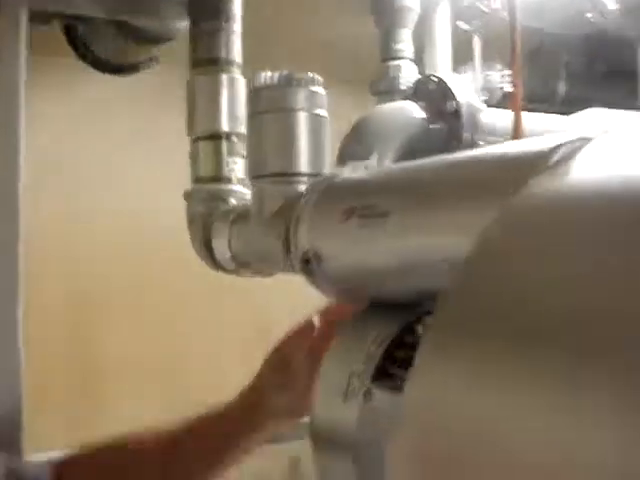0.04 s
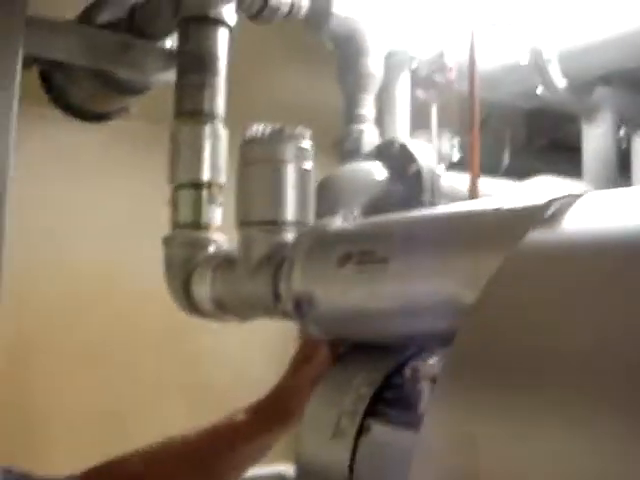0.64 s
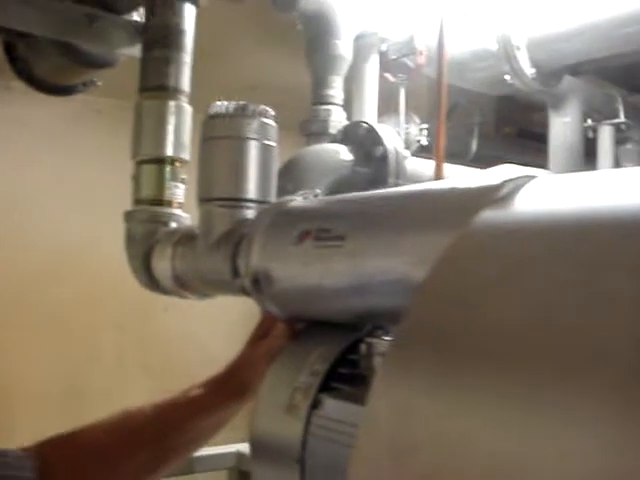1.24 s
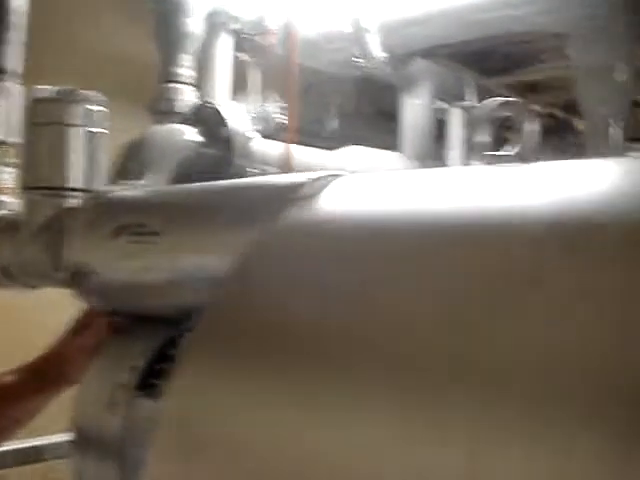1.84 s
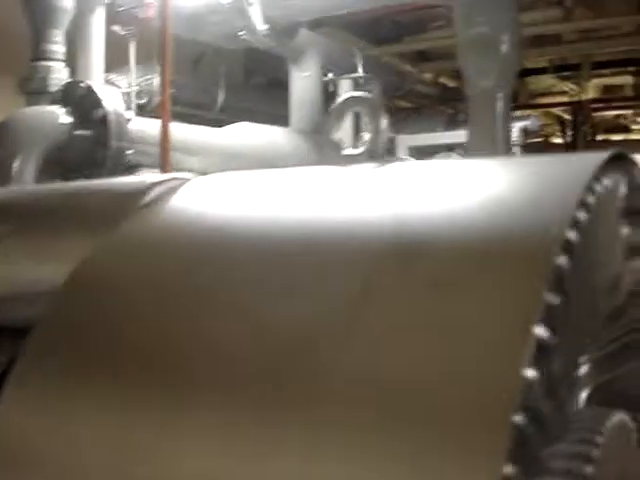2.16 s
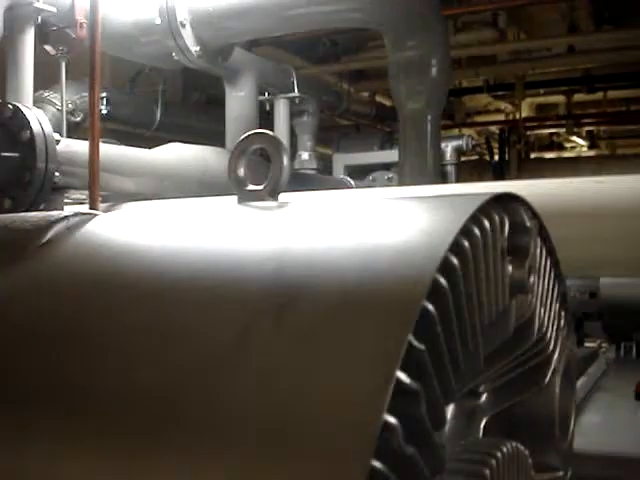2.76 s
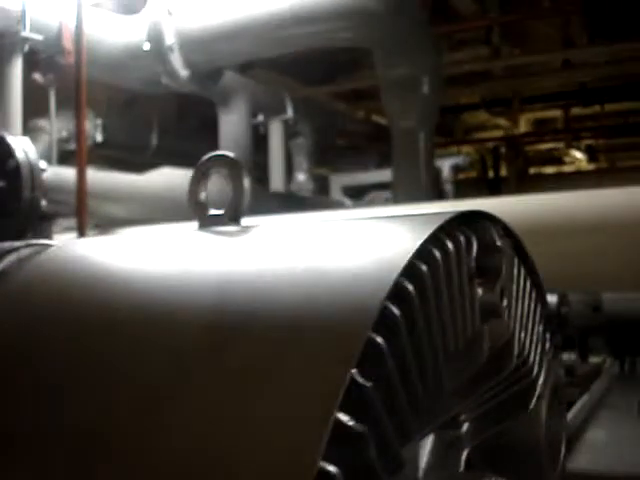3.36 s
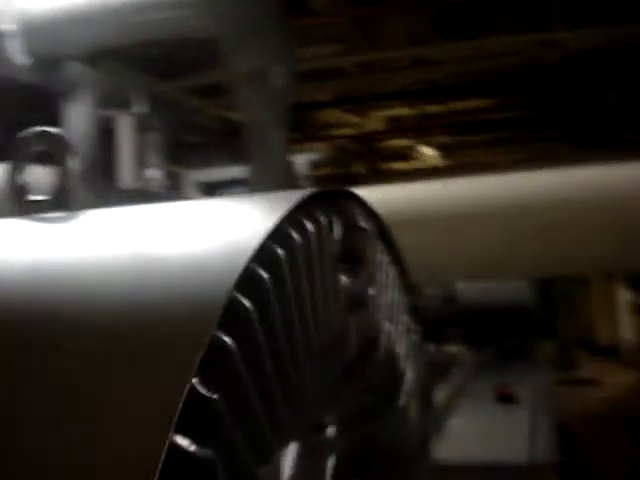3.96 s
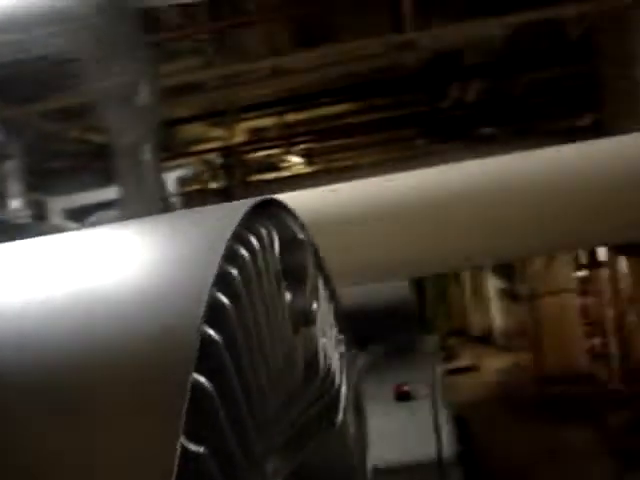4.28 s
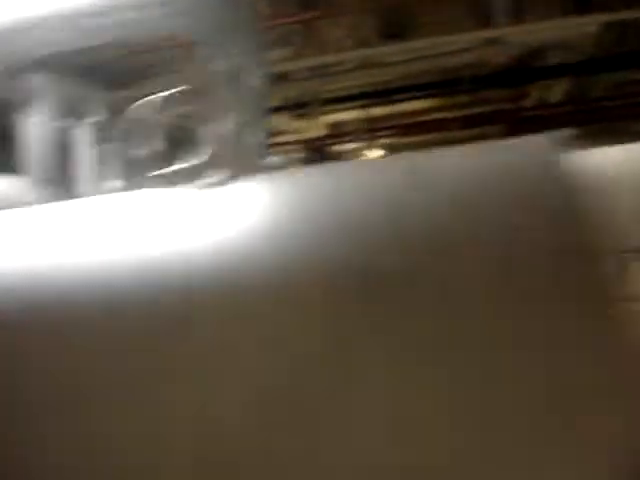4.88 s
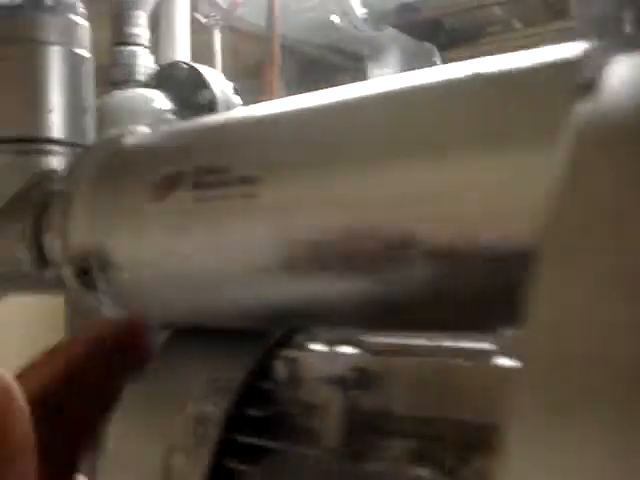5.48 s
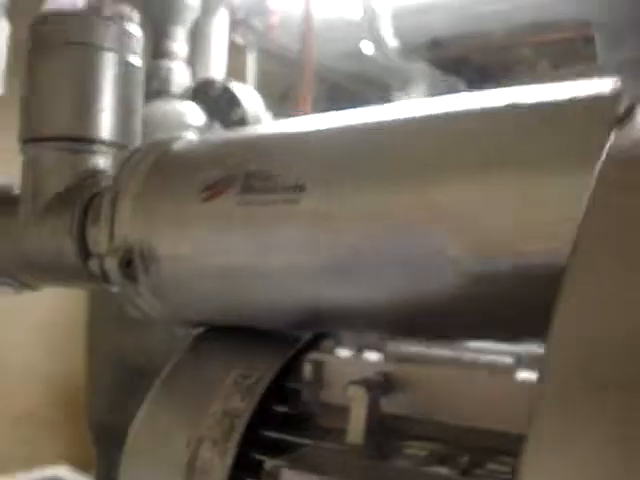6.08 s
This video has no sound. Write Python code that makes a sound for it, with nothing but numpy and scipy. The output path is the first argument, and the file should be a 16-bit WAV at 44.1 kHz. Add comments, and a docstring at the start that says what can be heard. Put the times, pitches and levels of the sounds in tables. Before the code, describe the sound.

Rushing air and a piercing, steady whine come from a metal blower, heard up close in a machine room. The whine keeps its pitch but shimmers as the microphone travels along the machine. After about two seconds the air softens a little, and a cooling fan's note and a lower motor tone come forward. Toward the end the balance shifts back to the blower's hiss and a higher thin tone, running without a break.

```python
"""Plant room, a regenerative blower at steady speed; one microphone, close, carried along the housing.
From the start the blades chop the air into a siren-like whine over a broad rush, with thin motor tones.
By 0.7 s the microphone faces the blower head. From about 2.2 s it faces the motor: the rush eases, and
the cooling fan's note and a lower motor tone come forward. From about 4.7 s it favours the head again.
All the way, each blade partial swells and fades as the microphone moves through standing waves."""
import sys
import numpy as np
from scipy import signal
from scipy.io import wavfile
from scipy.ndimage import uniform_filter1d

SR = 44100
rng = np.random.default_rng(int(sys.argv[2]) if len(sys.argv) > 2 else 0)


def file_out(sig):
    """Save sig as 16-bit WAV at sys.argv[1]."""
    # one column per channel
    cols = np.atleast_2d(sig).T
    # limit, then scale
    lim = np.clip(cols, -1, 1)
    pcm = np.round(lim * 32767).astype(np.int16)
    wavfile.write(sys.argv[1], SR, pcm)


N = 269877
TIME = np.arange(N) / SR
BLADE_PASS_HZ = 818
WALK_M_PER_S, SOUND_M_PER_S = 0.52, 343

# impeller's departure from the mean blade-pass rate: (time [s], offset [Hz])
BLADE_RATE_OFFSET = [(0.0, -0.85), (0.68, -0.013), (0.74, 1.85), (1.06, -0.21), (1.68, 0.88), (2.36, -0.71),
                     (2.4, 0.61), (3.42, -1.24), (3.78, 0.527), (3.94, -0.87), (5.24, -0.022), (6.12, -0.8)]
# blade partials 1-7 along the walk, the 2nd being the core of the whine: (time [s], relative level [dB])
PARTIAL_1 = [(0.0, -39), (0.32, -46), (0.48, -54.8), (1.66, -40.5), (4.92, -39.5), (5.82, -49.5),
             (6.12, -38)]
PARTIAL_2 = [(0, -23.5), (0.64, -27.5), (0.96, -34.5), (1.2, -28), (2.4, -24.5), (2.66, -22), (2.92, -23.5),
             (3.1, -22), (3.84, -22.5), (4, -38), (4.1, -26.5), (4.68, -29.5), (4.9, -39.5), (5.18, -28.5),
             (5.48, -42.9), (5.6, -28), (6, -26.7), (6.12, -33)]
PARTIAL_3 = [(0.0, -21), (0.24, -27), (1.18, -25), (1.86, -31.6), (2.06, -23.5), (2.42, -30), (2.84, -44.4),
             (2.92, -28.1), (3.08, -42), (3.14, -31), (3.64, -26.7), (3.78, -34.5), (4.68, -42.5),
             (4.9, -25.5), (5.76, -33.5), (6.12, -25.5)]
PARTIAL_4 = [(0.0, -26), (0.18, -52), (0.58, -38), (2.32, -24), (2.9, -30.4), (3.24, -28), (3.8, -34.5),
             (4.12, -26.7), (4.94, -29), (5.02, -35), (5.44, -36), (5.5, -28), (5.88, -26.0), (6.04, -34),
             (6.12, -24)]
PARTIAL_5 = [(0.0, -24.5), (0.18, -33.8), (0.24, -45), (0.64, -46), (0.74, -24.5), (0.84, -30.7),
             (2.24, -30.5), (2.46, -35.5), (3.24, -28), (3.58, -45), (3.78, -27.5), (4.1, -28.6),
             (4.54, -21.5), (5.02, -28.0), (5.18, -24), (5.9, -38.5), (5.98, -50), (6.12, -30.7)]
PARTIAL_6 = [(0.0, -41), (0.28, -53), (0.5, -34.5), (1.64, -41), (1.9, -35.5), (2.18, -46.5), (4.74, -31),
             (4.92, -48.4), (5.14, -31.5), (5.74, -45), (6.12, -38.8)]
PARTIAL_7 = [(0.0, -36.5), (1.5, -40), (1.68, -33.6), (2.74, -41), (4.18, -45.5), (4.82, -35),
             (5.14, -42.3), (5.62, -29.5), (6.12, -40.5)]
# faint top partials that fade at random: (multiple of the blade-pass rate, mean level [dB])
TOP_PARTIALS = [(9, -41.5), (10, -44.5)]
# blade partials arriving by way of the room: (multiple of the blade-pass rate, level [dB])
ROOM_PARTIALS = [(3, -42), (4, -39), (5, -37), (6, -45), (7, -44), (8, -42.5), (9, -46.5), (10, -47),
                 (11, -46.5), (12, -45.5)]
# how squarely the microphone faces the blower head rather than the motor: (time [s], facing [dB])
HEAD_FACING = [(0, 1.5), (.7, 7), (1.85, 7), (2.25, -4), (3.4, -2), (4.2, -1.5), (4.75, 3), (5.3, 1),
               (5.65, 5.5), (6.12, 4)]
# spectrum of the rushing air: (frequency [Hz], relative density [dB])
RUSH_SPECTRUM = [(20, -14.5), (85, -28), (135, -16.5), (160, -16.5), (370, -4), (600, -2.5), (750, -4),
                 (920, 0.3), (1400, -2), (2200, -2.5), (2900, -2.5), (3750, -4.5), (6000, -4),
                 (8600, -10.5), (10000, -11)]
# resonances of housing and silencer: (frequency [Hz], width [Hz], boost [dB])
HOUSING_RESONANCES = [(1160, 89, 0), (2480, 120, 2), (3350, 78, 4.5), (4140, 170, 5)]
# thin motor tones: (frequency [Hz], level [dB])
MOTOR_TONES = [(845, -49.5), (1459, -52.5), (1789, -52), (2672, -46), (2767, -52), (2857, -48), (2976, -49),
               (3036, -46), (3088, -49), (3581, -52.5), (5982, -52), (9641, -54)]
# tones strongest beside the blower head: (frequency [Hz], level at 0 dB facing [dB])
HEAD_SIDE_TONES = [(296.1, -61.5), (619, -56), (1517, -45.5), (2149, -44), (2271, -48.5), (6428, -48)]
# the two loudest thin tones: (pitch beside the motor [Hz], pitch beside the head [Hz])
LOUD_PAIR_HZ = (1909.5, 3213.5)
# those two tones, lower first: (level at 0 dB facing [dB], change with facing [dB/dB])
LOUD_PAIR_LEVELS = [(-40, -0.9), (-39.5, 1)]
# mains and shaft hum: (frequency [Hz], level [dB])
HUM_TONES = [(58.5, -65), (86.1, -67.5), (107.7, -60), (119.8, -60.5)]


def impeller_whine(wobble_hz=0.815, jitter_hz=1.316, lift_db=0.22):
    """Blades pass the port; turbulence shakes their timing, which blurs the high partials most."""
    wobble = wobble_hz * drift(rate_hz=8.9).real
    jitter = jitter_hz * drift(rate_hz=43.4).real
    rate_hz = BLADE_PASS_HZ + curve(BLADE_RATE_OFFSET) + wobble + jitter
    cycles = np.cumsum(rate_hz) / SR
    whine = np.zeros(N)
    main_partials = (PARTIAL_1, PARTIAL_2, PARTIAL_3, PARTIAL_4, PARTIAL_5, PARTIAL_6, PARTIAL_7)
    for k, levels in enumerate(main_partials, 1):
        gain = gain_of(curve(levels) + lift_db) * standing_waves(k * BLADE_PASS_HZ, reflected=0.017)
        whine += gain * tone(k * cycles, scatter=0.047 * k, width_hz=30)
    for k, db in TOP_PARTIALS:
        gain = gain_of(db) * standing_waves(k * BLADE_PASS_HZ, reflected=0.061)
        whine += gain * tone(k * cycles, scatter=0.06 * k, width_hz=3 * k)
    for k, db in ROOM_PARTIALS:  # the room's share is even everywhere, so a weak partial flutters
        whine += gain_of(db) * fuzzy_tone(k * cycles, width_hz=12.8)
    return whine


def standing_waves(hz, reflected):
    """Gain at a moving microphone: the reflected share fades in and out about once per wavelength."""
    wavelengths_per_s = hz * WALK_M_PER_S / SOUND_M_PER_S
    return unit_rms(abs(np.sqrt(1 - reflected) + np.sqrt(reflected) * drift(wavelengths_per_s)))


def air_rush(level_db=-24.5, ripple_db=2.0, roar_follow=0.11, hiss_follow=0.13):
    """Turbulent air, coloured by the housing and by the many narrow resonances of pipes and room."""
    frame, hop = 2048, 512
    hz = np.fft.rfftfreq(frame, 1 / SR)
    frame_times = np.arange(N // hop + 5) * hop / SR
    real, imag, ripple = rng.standard_normal((3, len(frame_times), len(hz)))
    ripple = uniform_filter1d(ripple, size=70, axis=0)  # slow in time
    ripple = unit_rms(uniform_filter1d(ripple, size=3, axis=1))  # narrow in frequency
    spectrum_hz, spectrum_db = np.transpose(RUSH_SPECTRUM)
    colour_db = np.interp(np.log(hz + 1), np.log(spectrum_hz), spectrum_db)
    for centre, width, boost_db in HOUSING_RESONANCES:
        colour_db += boost_db / (1 + (2 * (hz - centre) / width) ** 2)
    treble = hz ** 2 / (hz ** 2 + 3000 ** 2)
    follow = roar_follow * (1 - treble) + hiss_follow * treble  # the housing shades the hiss more
    shade_db = curve(HEAD_FACING, frame_times)[:, None] * follow
    spectra = (real + 1j * imag) * gain_of(colour_db + shade_db + ripple_db * ripple)
    _, rush = signal.istft(spectra.T, nperseg=frame, noverlap=frame - hop)
    return gain_of(level_db) * unit_rms(rush[:N])


def motor_tones():
    """Narrow magnetic tones and hum, steadier than the whine; some follow where the microphone points."""
    facing_db = curve(HEAD_FACING)
    tones = np.zeros(N)
    for hz, db in MOTOR_TONES:
        tones += gain_of(db) * tone(hz * TIME, scatter=1.0, width_hz=1.36)
    for hz, db in HEAD_SIDE_TONES:
        tones += gain_of(db + facing_db) * tone(hz * TIME, scatter=0.32, width_hz=1.5)
    for hz, (db, follow) in zip(LOUD_PAIR_HZ, LOUD_PAIR_LEVELS):
        tones += gain_of(db + follow * facing_db) * tone(hz * TIME, scatter=0.52, width_hz=1.7)
    for hz, db in HUM_TONES:
        tones += gain_of(db) * tone(hz * TIME, scatter=0.76, width_hz=0.6)
    return tones


def cooling_fan(note_hz=1062, base_db=-42, follow=-0.36):
    """The motor's cooling fan rings a fuzzy note in its cowl, loudest away from the blower head."""
    return gain_of(base_db + follow * curve(HEAD_FACING)) * fuzzy_tone(note_hz * TIME, width_hz=18)


def tone(cycles, scatter, width_hz):
    """A tone of rms 1 in random phase, whose unsteady part smears it into a narrow skirt."""
    carrier = np.exp(2j * np.pi * (cycles + rng.random()))
    return unit_rms(((1 + scatter * drift(width_hz)) * carrier).real)


def fuzzy_tone(cycles, width_hz):
    """A narrow band of noise around a pitch, rms 1."""
    return unit_rms((drift(width_hz) * np.exp(2j * np.pi * cycles)).real)


def drift(rate_hz):
    """Complex random motion of rms 1, slower than about rate_hz."""
    points, points_per_s = 8192, 1000
    hz = np.fft.fftfreq(points, 1 / points_per_s)
    noise = rng.standard_normal((points, 2)) @ [1, 1j]
    motion = np.fft.ifft(noise / np.sqrt(1 + (hz / rate_hz) ** 4))
    return unit_rms(np.interp(TIME, np.arange(points) / points_per_s, motion))


def curve(rows, t=TIME):
    """Joins (time, value) rows by straight lines."""
    return np.interp(t, *np.transpose(rows))


def gain_of(db):
    """Decibels to amplitude."""
    return 10 ** (db / 20)


def unit_rms(x):
    """Scales to rms 1."""
    return x / np.sqrt(np.mean(abs(x) ** 2) + 1e-20)


def scene():
    """One microphone beside the blower feeds both channels."""
    return np.tile(impeller_whine() + air_rush() + motor_tones() + cooling_fan(), (2, 1))


def record(dry):
    """The recorder's band limit, with soft ends."""
    low_pass = signal.firwin(511, cutoff=10020, window=("kaiser", 9), fs=SR)
    soft_ends = signal.windows.tukey(N, 0.0005)
    return signal.oaconvolve(dry * soft_ends, low_pass[None], "same")


dry = scene()
out = record(dry)
file_out(out)
```